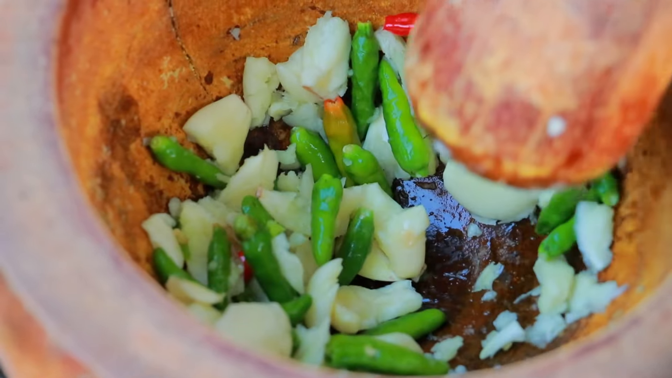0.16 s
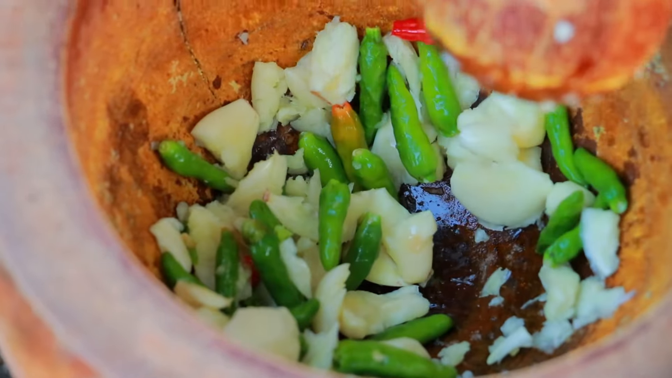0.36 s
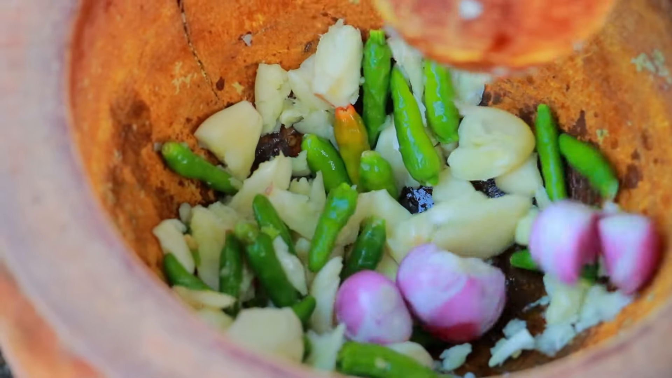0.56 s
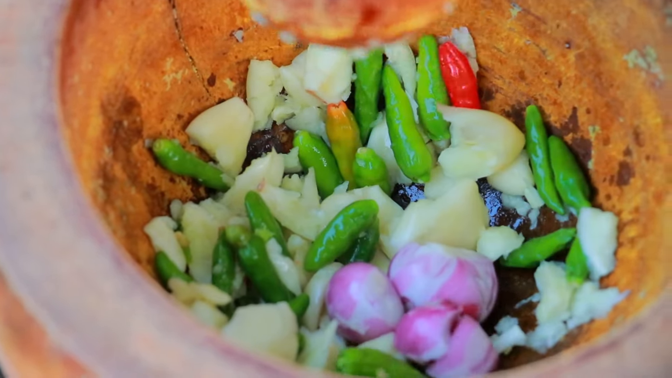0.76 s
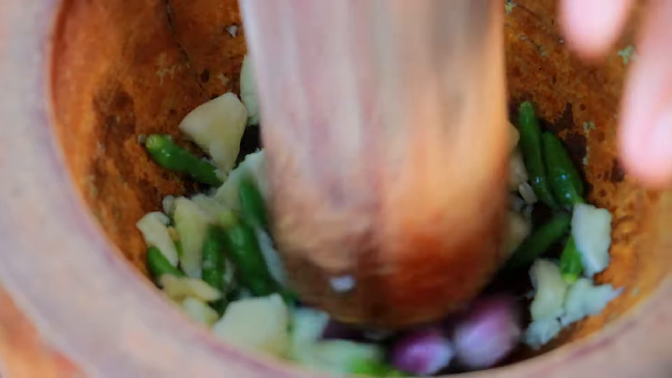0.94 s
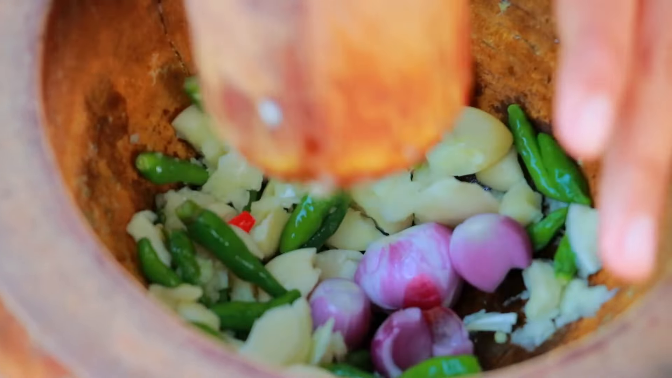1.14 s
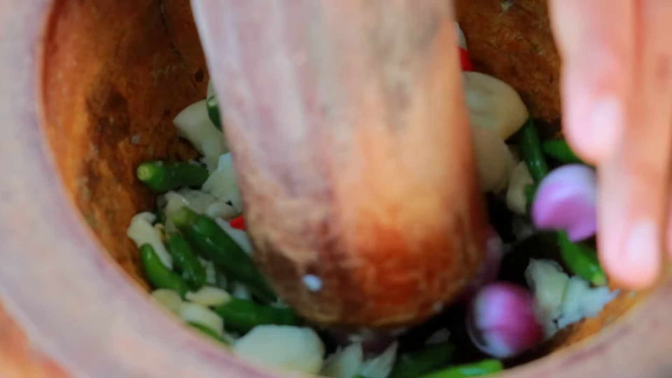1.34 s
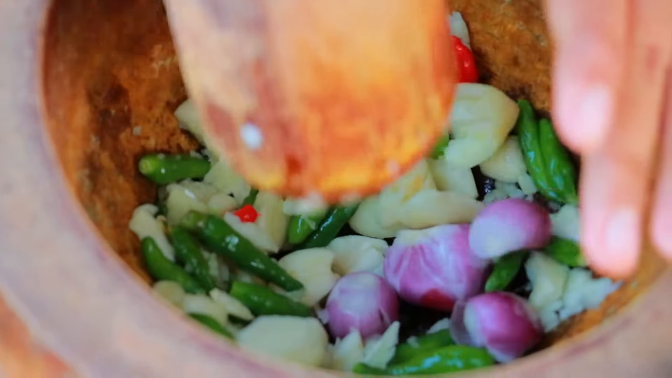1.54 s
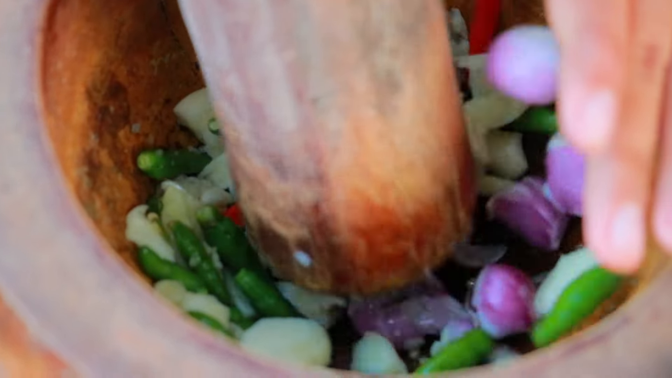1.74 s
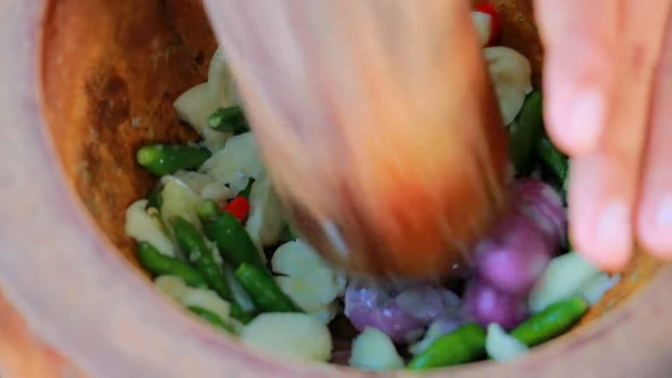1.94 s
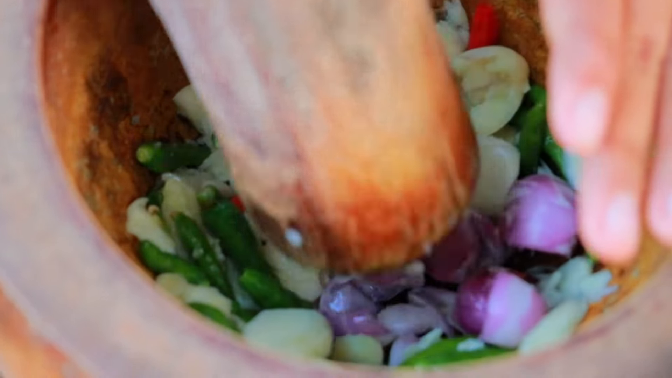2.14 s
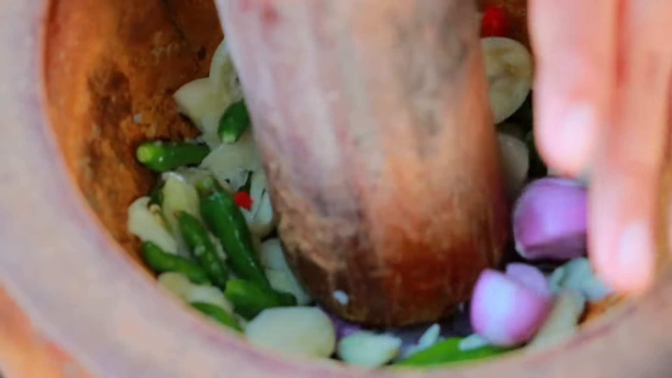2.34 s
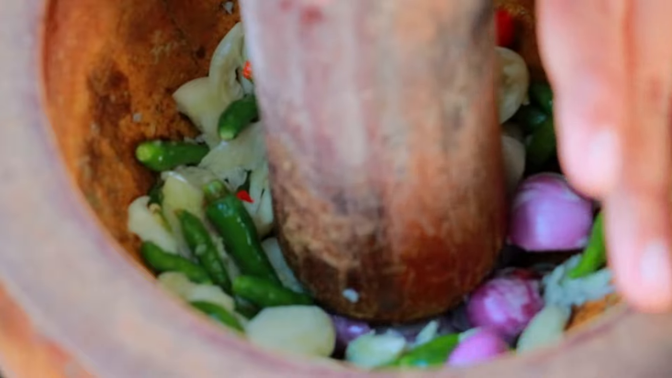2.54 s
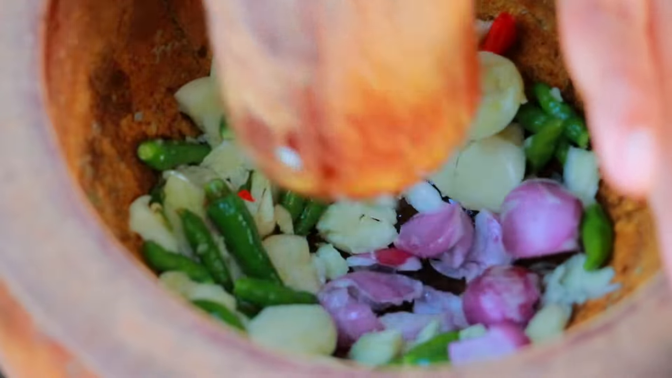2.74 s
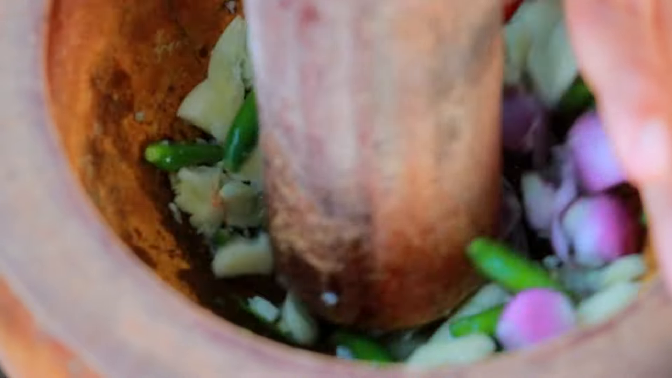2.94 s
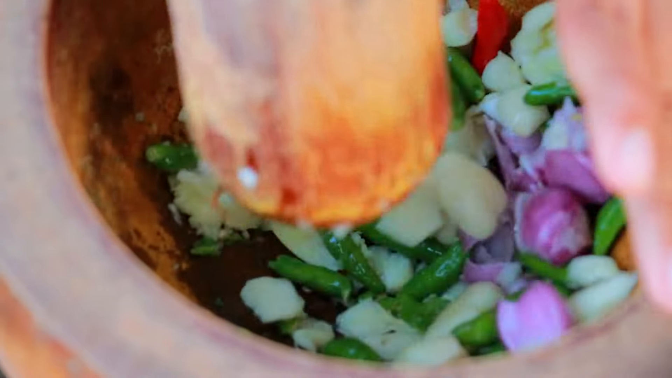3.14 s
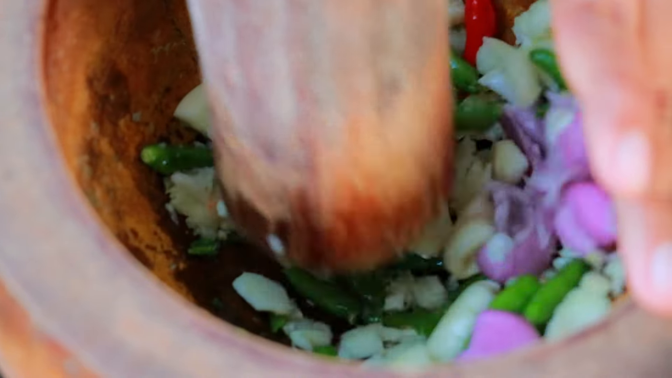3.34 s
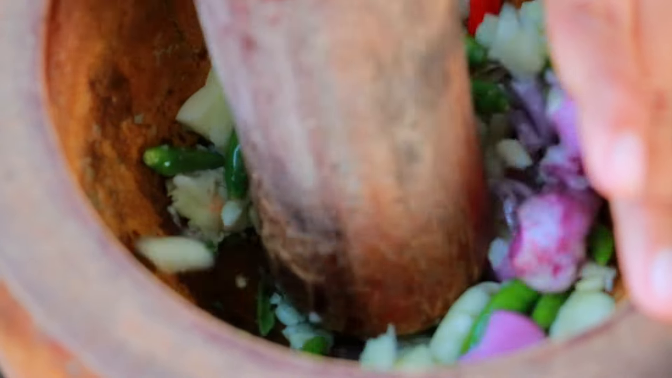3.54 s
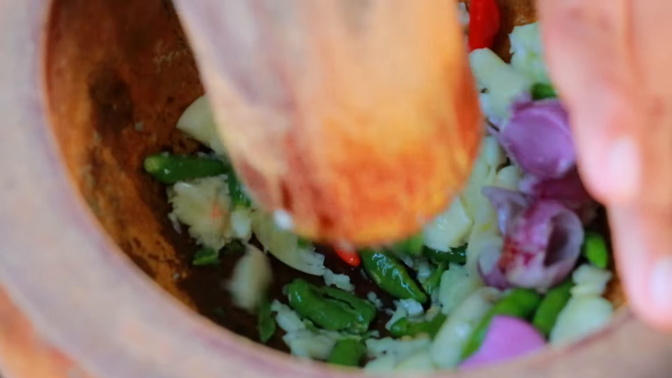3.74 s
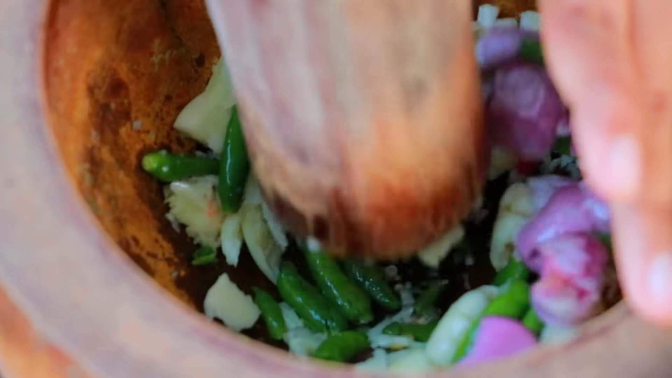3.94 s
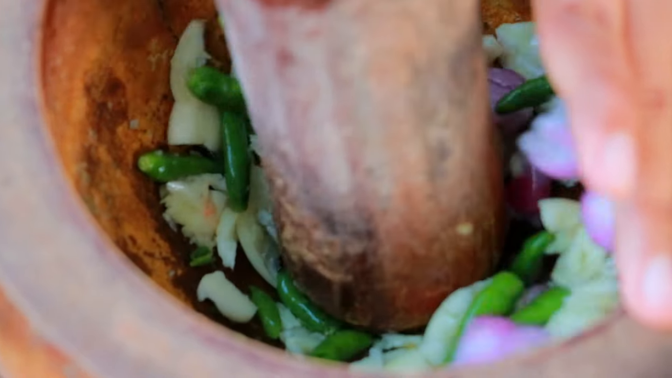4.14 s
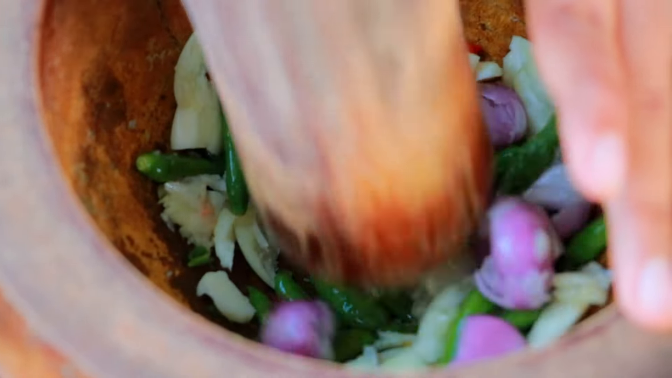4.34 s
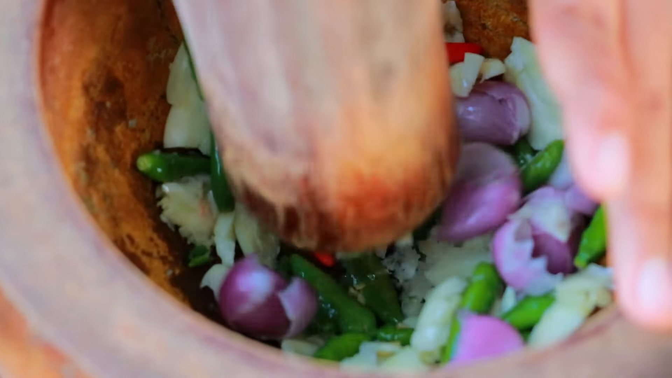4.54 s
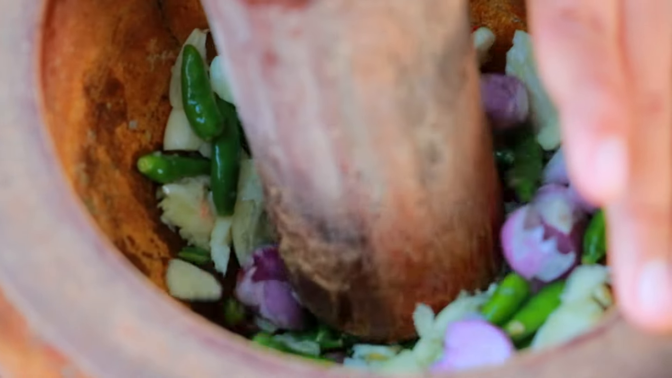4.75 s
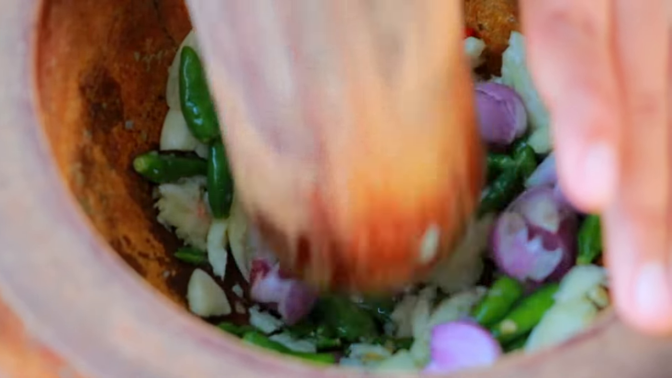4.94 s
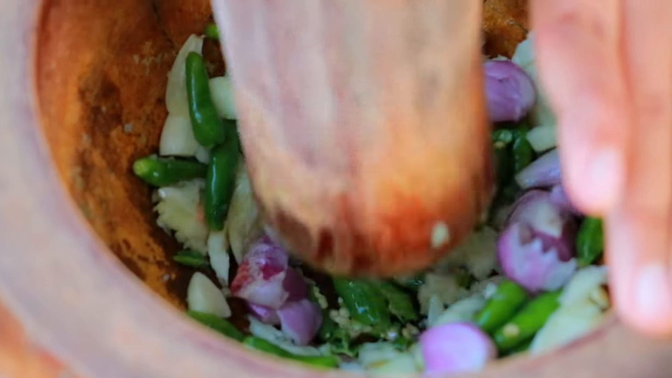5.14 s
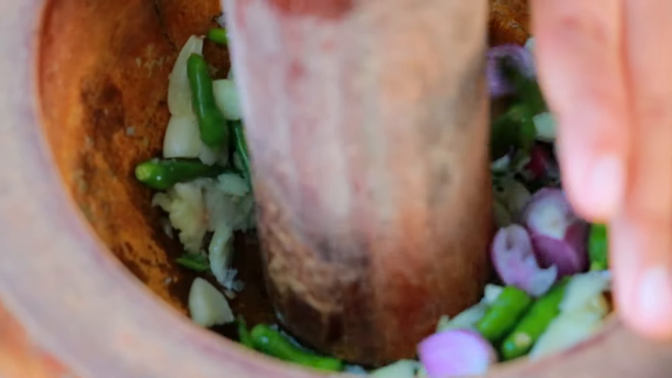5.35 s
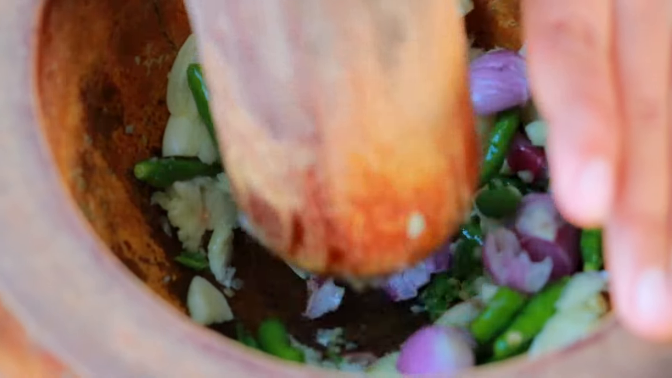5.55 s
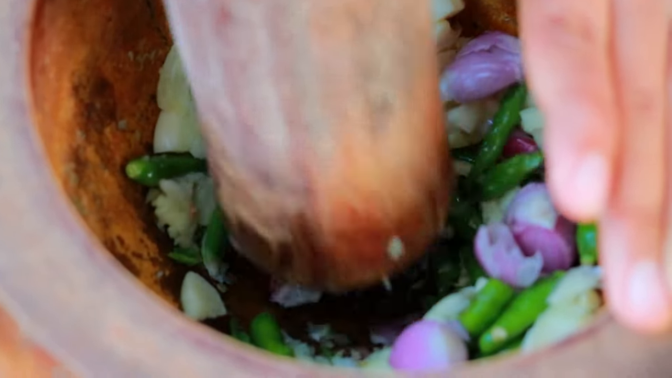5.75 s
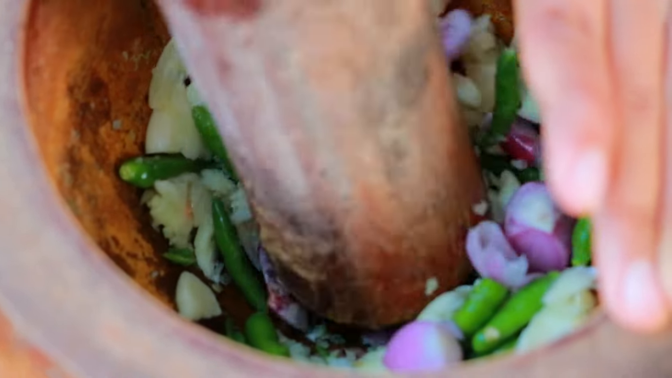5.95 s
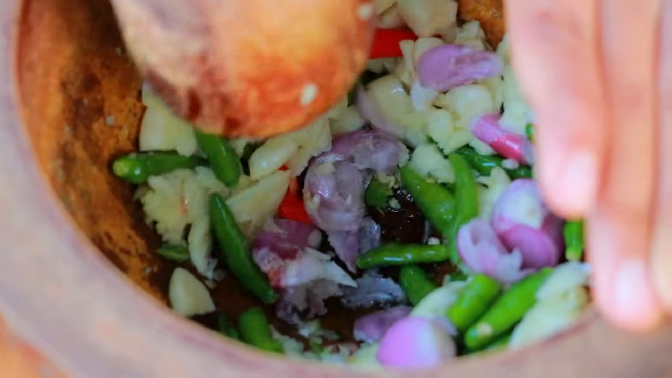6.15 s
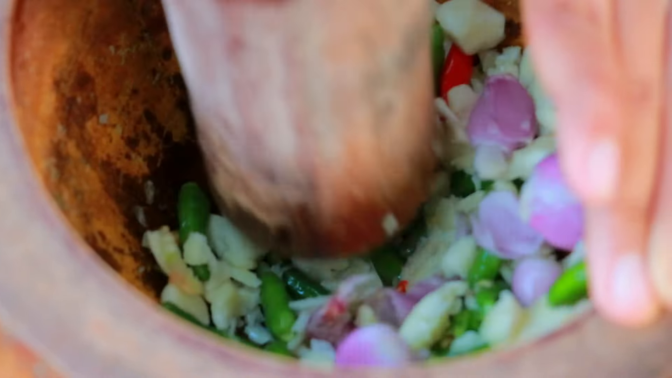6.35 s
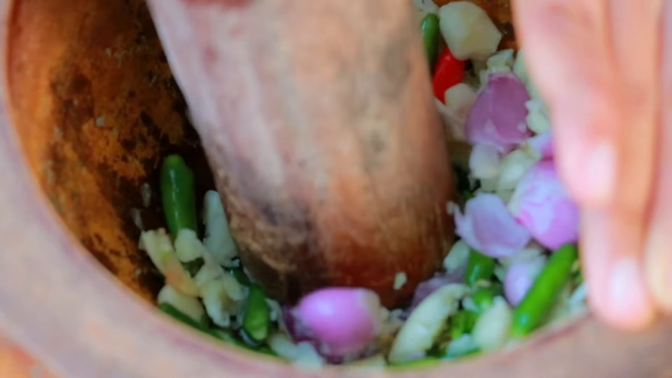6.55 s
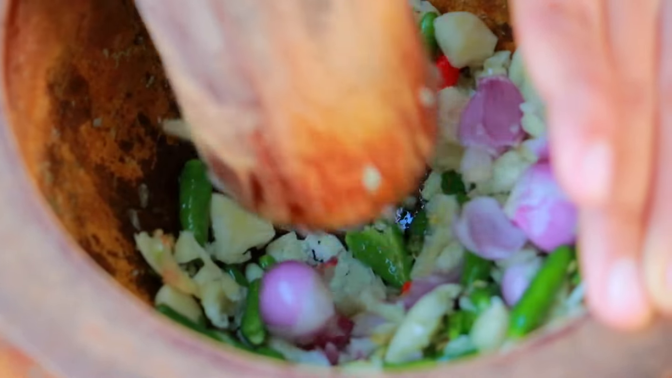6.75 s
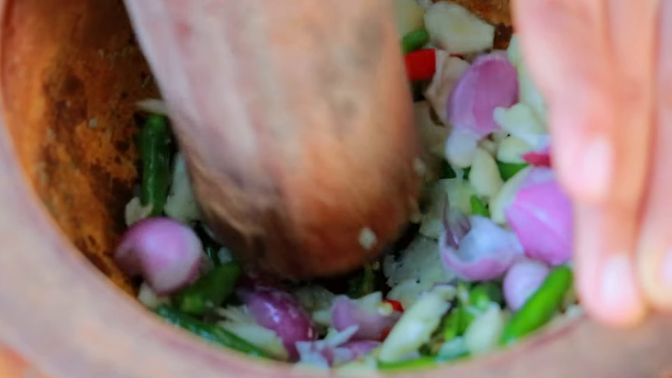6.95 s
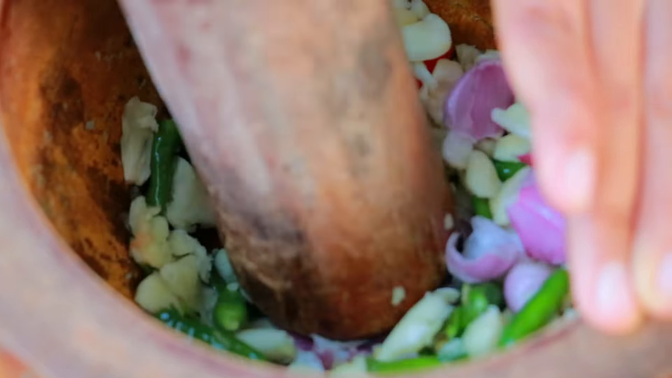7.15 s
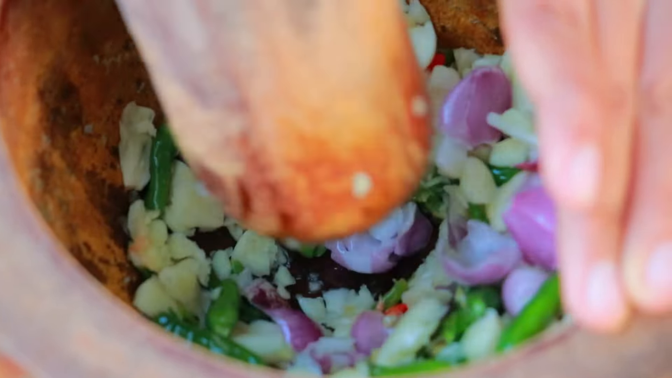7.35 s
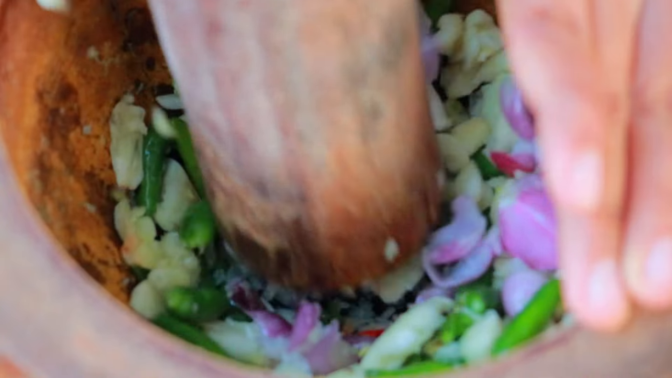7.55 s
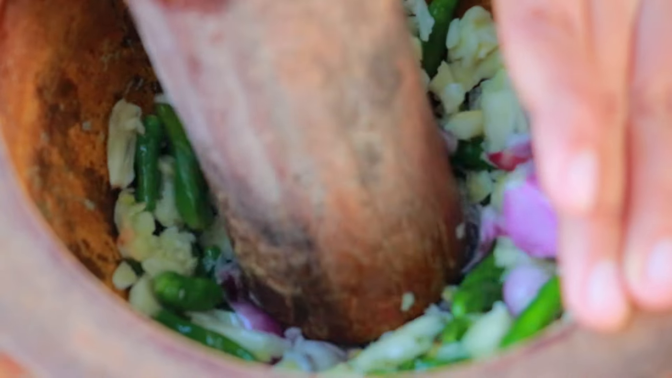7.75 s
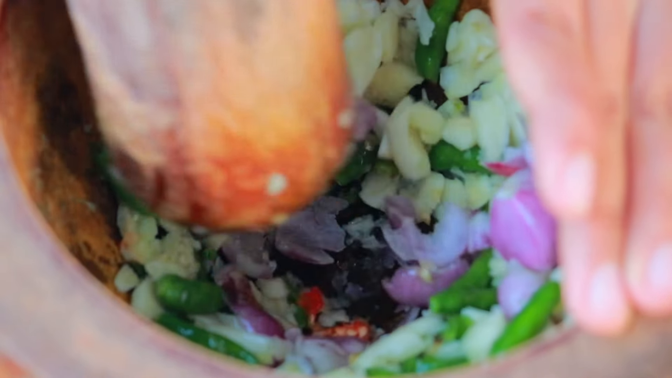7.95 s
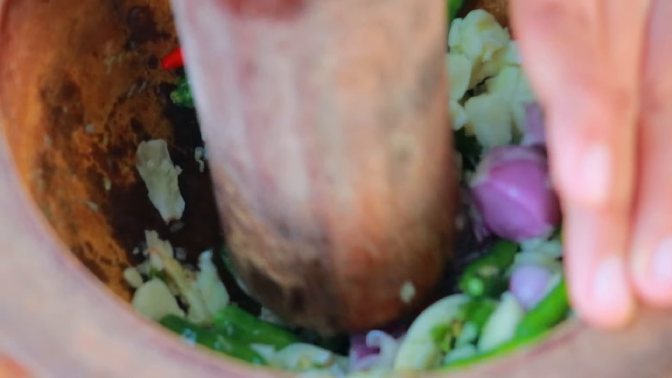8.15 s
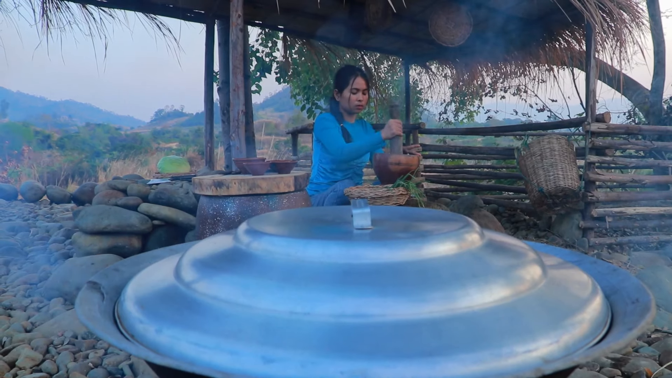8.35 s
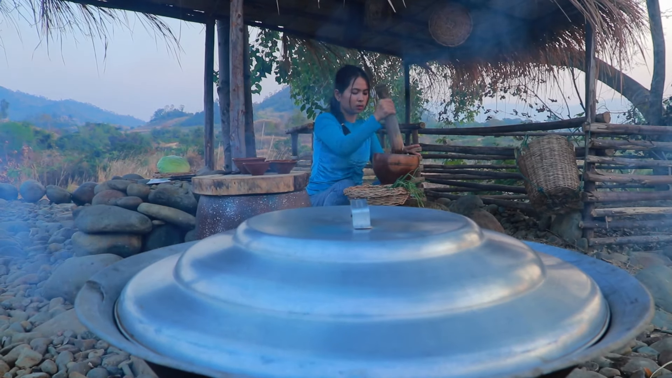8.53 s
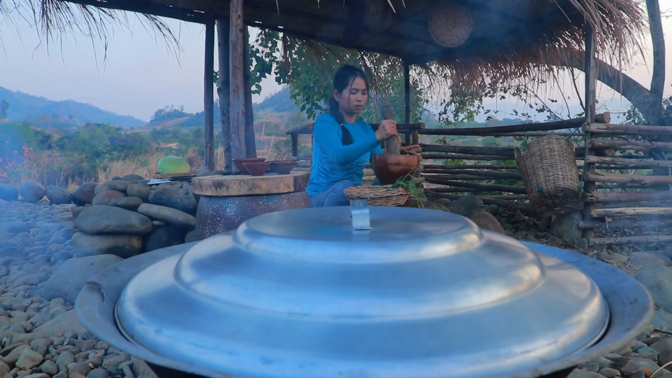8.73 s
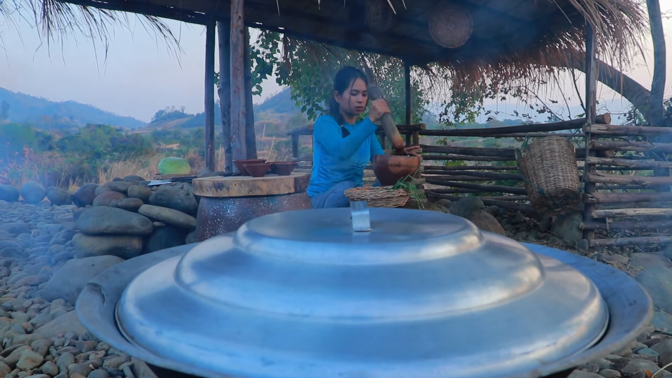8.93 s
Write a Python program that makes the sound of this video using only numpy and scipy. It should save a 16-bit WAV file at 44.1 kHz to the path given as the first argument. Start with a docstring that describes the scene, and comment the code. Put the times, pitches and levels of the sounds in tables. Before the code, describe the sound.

Shallots drop softly into a clay mortar, then steady pestle blows crunch and knock, close and loud, before the last strokes sound from farther off.

```python
"""Wet crunches and hard knocks: a wooden pestle pounds garlic, chilies and shallots in a clay mortar outdoors.
Crunches are bursts of crackling noise; knocks are short fading tones of the bowl, its clay and its foot.
Pestle bounces, falling pieces, squelches and gritty scrapes fill the gaps; the loudest peaks are clipped.
A bird whistles now and then over hiss, breeze and a far drone, made of sliding tones and filtered noise.
After a very brief dip in level, the last two strokes are heard from across the yard."""
import sys
import numpy as np
from scipy import signal
from scipy.fft import rfft, irfft, next_fast_len
from scipy.io import wavfile
from scipy.ndimage import uniform_filter1d

SR = 44100
rng = np.random.default_rng(int(sys.argv[2]) if len(sys.argv) > 2 else 0)


def log_audio(samples):
    """Write samples as a 16-bit WAV file to the path given in sys.argv[1]."""
    # one column per channel
    frames = np.atleast_2d(samples).T
    # limit to full scale, then quantise
    limited = np.clip(frames, -1, 1)
    pcm = np.round(limited * 32767).astype(np.int16)
    wavfile.write(sys.argv[1], SR, pcm)


N = 396459
TIME = np.arange(N) / SR
CUTOFF_HZ = 16000   # top of the sound

# downstrokes of the pestle: (time [s], knock level [dB], hollow pitch of the bowl [Hz], contact time [ms],
# clay ring level [dB], crunch level [dB], crunch fade [ms], crunch treble [dB], bench boom level [dB])
STROKES = [ (1.023, -10.5, 525, 0.92, -6, -20.5, 6.5, 7.5, -55),
           (1.369, -4.5, 638, 0.14, -19.5, -4.5, 2.2, 0, -30),
           (1.693, -3, 520, 0.74, -17.5, 0.5, 4.2, -9.5, -34),
           (2.050, -1.5, 546, 0.96, -8, -7, 4.4, 0.5, -34),
           (2.402, -9.5, 724, 0.73, -0.5, -1.5, 1.93, -5.5, -30),
           (2.952, 18, 760, 0.83, -13.5, -21.5, 17, -2.5, -48),
           (3.297, -13, 663, 0.48, -7.5, 0, 2.13, 1, -26), (3.591, 6.5, 596, .46, -11.5, 4.5, 2.2, -6, -25),
           (3.884, 10, 476, 0.68, -25, 7, 2.3, -11.5, -28),
           (4.1667, 9.5, 591, 1.06, -6.5, 5.5, 3.4, -11.5, -28.5),
           (4.459, 14.5, 629, 0.64, -15, 4.5, 2.45, -7.5, -25),
           (4.752, 8, 490, 0.34, -16.5, 1, 4.2, -8, -27.5),
           (5.062, 12, 574, 2.08, -20, -1, 4.7, -2.5, -35.5),
           (5.377, 13.5, 515, 1.07, -10, -9, 7.2, 5, -27.5),
           (5.687, 17.5, 611, 0.5, -3.5, 3, 3.1, -3.5, -26),
           (5.982, -7, 530, .6, -8.5, -3.5, 3.2, -1.5, -27.5),
           (6.261, 14, 863, 0.97, -10.5, -21.5, 13, -11, -41),
           (6.6033, 5.5, 592, 1.37, -14, 2, 2.8, -2.5, -26), (6.897, -8, 636, 0.4, -12, 2, 2.47, 0.5, -27),
           (7.201, -26, 670, 0.22, 0, -1.5, 6.8, 0, -50), (7.501, 2.5, 634, 0.19, -26, 3, 4.5, -20.5, -25),
           (7.806, 15.5, 654, 0.37, -8, 2, 4, -0.5, -31.5),
           (8.08, -6.5, 480, 1.77, 1.5, -22.5, 2.9, 12.5, -53),
           (8.3533, 7, 730, 0.067, -14, -9, 2.8, -30, -31),
           (8.764, 10.5, 724, 0.33, -16.5, -20, 10.5, -37, -46)]
# shallots drop in, and pieces tumble back as the pestle lifts: (time [s], level [dB])
TUMBLES = [(.551, -21), (.572, -18), (.635, -32), (.658, -30), (.763, -31), (1.166, -26), (1.492, -22.5),
           (2.520, -26), (3.997, -27.5), (4.333, -26), (5.563, -35), (6.857, -23), (6.983, -25)]
# colour of the crunch: (frequency [Hz], relative level [dB])
CRUNCH_COLOUR = [(100, -51.5), (400, 5.5), (750, 6), (1100, -4.5), (1500, 2), (2100, 0), (3000, 2),
                 (4500, 1.5), (6500, -3.5), (8600, 0.5), (10500, -7), (15500, -9)]
# brief dip in level before the strokes heard from afar: (start [s], end [s])
LULL = (8.207, 8.262)


def from_db(db):
    """Turn decibels into a gain."""
    return 10 ** (np.asarray(db) / 20)


def rms_one(x):
    """Scale a signal to an average power of one."""
    return x / np.sqrt(np.mean(x ** 2) + 1e-20)


def add(out, s, sound):
    """Mix a sound in at time s, in seconds."""
    i = max(round(s * SR), 0)
    out[i:i + len(sound)] += sound[:max(N - i, 0)]


def level_curve(rows):
    """Draw a gain over time through rows of time [s] and level [dB]."""
    return from_db(np.interp(TIME, *np.transpose(rows)))


def coloured(x, spectrum):
    """Shape a signal by a smooth spectrum; white noise keeps its power."""
    hz, db = np.transpose(spectrum)
    size = next_fast_len(len(x))
    bins = np.maximum(np.fft.rfftfreq(size, 1 / SR), 1)
    gain = from_db(np.interp(np.log(bins), np.log(hz), db))
    gain = gain * (bins < CUTOFF_HZ + 500)
    return irfft(rfft(x, size) * rms_one(gain), size)[:len(x)]


def resonate(x, hz, width_hz):
    """Pass a signal through one resonance, with a gain of about one at its top."""
    r = np.exp(-np.pi * width_hz / SR)
    forward = np.array([1, 0, -1]) * (1 - r * r) / 2
    feedback = [1, -2 * r * np.cos(2 * np.pi * hz / SR), r * r]
    return signal.lfilter(forward, feedback, x)


def crackle(t, grain_db, clump_db):
    """Tiny snaps of very uneven size, bunched in clumps, with an average power of one."""
    knots = t[::SR // 1200]   # clump strength changes about 1200 times a second
    clumps = from_db(clump_db * np.interp(t, knots, rng.standard_normal(len(knots))))
    sizes = from_db(grain_db * np.minimum(rng.exponential(1, len(t)), 4))
    return rms_one(rng.standard_normal(len(t)) * sizes * clumps)


def ring(modes, t):
    """Fading tones; each blow lands elsewhere and so changes their levels and pitches a little."""
    hz, db, t60 = np.transpose(modes)[:, :, None]
    weight, shift = rng.standard_normal((2, len(modes), 1))
    level = from_db(db + 2 * weight - 60 * t / t60)
    pitch = hz * (1 + .012 * shift)
    return np.sum(level * np.cos(2 * np.pi * pitch * t), axis=0)


def shelter(x, t60, dull_hz):
    """Scattered echoes from posts, roof and ground, made of fading noise with its treble softened."""
    t = TIME[:SR // 2]
    fade = from_db(-60 * t / t60) * (t > .004)   # the first echo comes after 4 ms
    echoes = rng.standard_normal(len(t)) * fade
    echoes = signal.lfilter(*signal.butter(1, dull_hz, fs=SR), echoes / np.linalg.norm(echoes))
    return signal.fftconvolve(x, echoes)[:N]


def outdoors(air_db=-48, drone_hz=145, drone_width_hz=70):
    """Steady hiss of the open air over a low, changing breeze and a far-off drone, all filtered noise."""
    # colour of the outdoor air: (frequency [Hz], relative level [dB])
    air_colour = [(25, -1), (70, -8.5), (150, -2), (240, -6.5), (450, -10), (750, -6), (1200, -9),
                  (2500, -13.5), (5400, -19), (6500, -15), (7800, -20), (10000, -22.5), (11000, -26),
                  (16000, -26)]
    # low rumble of the breeze: (time [s], level [dB])
    breeze_level = [(0, -72), (.7, -61), (1.0, -46.5), (1.6, -51.5), (2.2, -51), (2.7, -72), (5, -67.5),
                    (8.1, -59.5), (8.4, -56.5), (8.99, -51)]
    # colour of the breeze: (frequency [Hz], relative level [dB])
    breeze_colour = [(20, 5.5), (65, 3.5), (100, -3.5), (170, -9.5), (300, -11.5), (1000, -35), (5000, -52)]
    # far-off low drone: (time [s], level [dB])
    drone_level = [(0, -58), (3.5, -87), (4.5, -95), (5.8, -53), (7, -66), (8.2, -58), (8.3, -51.5),
                   (8.99, -46.5)]
    air = from_db(air_db) * coloured(rng.standard_normal(N), air_colour)
    breeze = level_curve(breeze_level) * coloured(rng.standard_normal(N), breeze_colour)
    hum = rms_one(resonate(rng.standard_normal(N), drone_hz, drone_width_hz))
    return air + breeze + level_curve(drone_level) * hum


def bird():
    """Thin distant whistles, level or sliding; a randomly wavering pitch makes some of them hoarse."""
    # notes: (time [s], length [s], start pitch [Hz], end pitch [Hz], level [dB], pitch spread [Hz])
    notes = [(2.21, .07, 2440, 2630, -52, 60), (5.101, 0.15, 3880, 3880, -46, 220),
             (8.438, 0.08, 4560, 2510, -47, 40), (8.698, 0.023, 4050, 3950, -51, 40),
             (8.8, 0.076, 4660, 2440, -44.5, 39.6), (8.892, 0.046, 2290, 2310, -45, 70)]
    out = np.zeros(N)
    for s, length, start_hz, end_hz, db, spread_hz in notes:
        u = np.linspace(0, 1, int(length * SR))   # progress through the note
        waver = rms_one(uniform_filter1d(rng.standard_normal(SR // 2), size=80))[:len(u)]
        pitch = start_hz * (end_hz / start_hz) ** u + spread_hz * waver
        whistle = np.sin(2 * np.pi * np.cumsum(pitch) / SR)
        add(out, s, from_db(db) * np.sin(np.pi * u) * whistle)
    return out


def crumbs(db=-60.5, per_s=26, fade_s=0.0014):
    """Wet scraps shift and drop, each a faint, quickly fading tick of noise at a random moment."""
    born = (rng.random(N) < per_s / SR) * (TIME > TUMBLES[0][0]) * (TIME < LULL[0])
    sizes = born * rng.random(N) ** 2
    ticks = signal.lfilter([1], [1, -np.exp(-1 / (fade_s * SR))], sizes + 1e-18)
    return from_db(db) * rms_one(coloured(ticks * rng.standard_normal(N), CRUNCH_COLOUR))


def scrapes():
    """Something hard catches and slips on the rim: a few jerks of crackle make resonances sound."""
    # jerks: (time [s], relative level [dB], fade [ms])
    jerks = [(2.783, -37, 18), (2.826, -39.5, 34), (2.8396, -19, 2), (2.856, -31.5, 12), (2.868, -55, 16)]
    # resonances: (frequency [Hz], width [Hz], level [dB])
    peaks = [(1480, 63, 1), (3510, 260, -5.5), (3600, 290, 3.5), (4770, 210, 4), (6030, 1550, -15),
             (8450, 1100, -23)]
    grit, t = np.zeros(N), TIME[:SR // 8]
    for s, db, fade_ms in jerks:
        fade = np.exp(-1000 * t / fade_ms)
        add(grit, s, from_db(db + 8.5) * fade * crackle(t, grain_db=5.5, clump_db=5.0))
    return sum(from_db(db) * resonate(grit, hz, width_hz) for hz, width_hz, db in peaks)


def bench(hz=69, t60=0.19, swell_s=0.014):
    """The bench under the mortar gives a low boom that swells and dies away."""
    out, t = np.zeros(N), TIME[:SR // 3]
    fade = np.exp(-np.log(1000) * t / t60)
    boom = np.sin(2 * np.pi * hz * t) * fade * (1 - np.exp(-t / swell_s))
    for s, *_, db in STROKES:
        add(out, s, from_db(db) * boom)
    return out


def crushings(splinter_count=3):
    """List all crushing: strokes squeeze, burst and splinter the flesh; squelches and cracks come between."""
    # flesh squelches and skins rustle: (time [s], length [ms], level [dB], treble [dB])
    squelches = [ (0.55, 6.8, -36, 0.5), (.570, 75, -50.5, 6.5), (0.724, 27, -51.5, 8.5),
                 (0.784, 35, -54.5, 13.5), (2.038, 7.9, -21, 3.5), (2.548, 5.7, -38.5, -21),
                 (2.965, 28, -26, -8), (3.245, 62, -45, -.5), (3.541, 8, -34, -30), (3.69, 7, -38, -29),
                 (3.995, 14, -37.5, -33), (4.061, 3.5, -40.5, -28), (6.077, 31, -47.5, -5.5),
                 (6.263, 43, -24.5, -12), (6.349, 28, -40.5, -2), (6.428, 24, -49, -.5),
                 (7.407, 18.4, -50.5, 16.5), (7.605, 24, -57, 13.5), (7.694, 8, -55, 13.5),
                 (7.871, 17.4, -32.5, 2.5), (8.089, 17.5, -25, -8), (8.113, 12.4, -19.5, -6)]
    # single crisp skins crack: (time [s], level [dB])
    skin_cracks = [(.861, -37), (.934, -37.5), (1.181, -31), (1.713, -20), (3.286, -19), (3.903, -16.5),
                   (4.101, -37), (4.740, -21), (6.311, -16.5), (7.536, -22.5)]
    # splinters follow a burst after a random delay: (shortest [s], longest [s])
    splinter_delay = (0.011, .045)
    squeeze_db, squeeze_rise_ms, burst_rise_ms = -27, 6.44, 1.67   # flesh creaks just before it bursts
    splinter_db, splinter_spread_db, splinter_fade_db_per_s = -27, 2, 307.5   # level against the burst
    crack_ms, crack_treble_db = 1.28, 2
    # rows: (time [s], level [dB], build-up [ms], hold [ms], fade [ms], treble [dB])
    rows, cracks = [], list(skin_cracks)
    for s, *_, db, fade_ms, treble_db, _ in STROKES:
        rows.append((s, db + squeeze_db, squeeze_rise_ms, 0, fade_ms, treble_db))
        rows.append((s, db, burst_rise_ms, 0, fade_ms, treble_db))
        for delay in rng.uniform(*splinter_delay, splinter_count):
            weaker_db = splinter_db - splinter_fade_db_per_s * delay   # later splinters tend to be weaker
            uneven_db = splinter_spread_db * rng.standard_normal()
            cracks.append((s + delay, db + weaker_db + uneven_db))
    for s, ms, db, treble_db in squelches:
        rows.append((s, db, 0.17 * ms, ms, 0.3 * ms, treble_db))
    for s, db in cracks:
        rows.append((s, db, crack_ms, 0, crack_ms, crack_treble_db))
    return rows


def crunches(seep_db=-40, seep_s=0.051, pocket_db=0, pocket_width_hz=400, treble_hz=4500):
    """Cells snap in clumps, ever louder until the peak of the crush; juice crackles on a little."""
    snaps, bright = np.zeros((2, N))
    t = TIME[:SR // 4] - TIME[SR // 16]   # zero at the moment of the blow
    ms = 1000 * np.abs(t)
    for s, db, rise_ms, hold_ms, fall_ms, treble_db in crushings():
        falling = np.maximum(ms - hold_ms, 0) / fall_ms
        pressure = np.exp(-np.where(t < 0, ms / rise_ms, falling))
        juice = from_db(seep_db) * np.exp(-np.abs(t) / seep_s) * (t > 0)
        burst = pressure * crackle(t, grain_db=4.0, clump_db=4.0)
        burst = burst + juice * crackle(t, grain_db=10.5, clump_db=4.5)
        # air pockets in the wet pulp ring at other pitches each time
        pockets_hz = np.exp(rng.uniform(np.log(1900), np.log(9500), 4))
        pockets = sum(resonate(burst, hz, pocket_width_hz) for hz in pockets_hz)
        burst = from_db(db) * (burst + from_db(pocket_db) * pockets)
        add(snaps, s + t[0], burst)
        add(bright, s + t[0], burst * from_db(treble_db))
    # drier skins snap brighter than soft pulp
    treble = signal.lfilter(*signal.butter(1, treble_hz, "high", fs=SR), bright - snaps)
    return coloured(snaps + treble, CRUNCH_COLOUR)


def contacts(usual_hollow_hz=520, tumble_contact_ms=0.79, tumble_clay_db=-15.5):
    """List all that lands in the bowl: strokes, rebounds (the deeper the note, the softer) and tumbles."""
    # the pestle bounces or slips off the pulp and lands again:
    # (time [s], level [dB], hollow pitch [Hz], clay ring level [dB])
    rebounds = [ (1.736, -10, 756, -4.5), (1.893, -19, 860, -5), (2.433, -11.5, 500, 1),
                (2.9835, 3.5, 556, -0.5), (3.324, -13.5, 403, 1.5), (4.196, -17.5, 427, 8.5),
                (5.080, -21.5, 486, 13), (5.388, 1, 485, 5), (5.424, -12.5, 364, -15),
                (5.698, 14.5, 706, -22), (5.711, -15, 700, -5), (5.724, 0.5, 507, -2.5),
                (5.993, -2, 478, -1.5), (7.537, -6, 480, -14), (7.819, 6.5, 737, -12.5),
                (8.109, -10, 398, -10), (8.142, -9.5, 384, -3)]
    rebound_contact_ms, softening = 1.584, 1.2   # contact at the usual pitch; power by which it grows
    # rows: (time [s], level [dB], hollow pitch [Hz], contact time [ms], clay ring level [dB])
    rows = [stroke[:5] for stroke in STROKES]
    for s, db, hz, clay_db in rebounds:
        contact_ms = rebound_contact_ms * (usual_hollow_hz / hz) ** softening
        rows.append((s, db, hz, contact_ms, clay_db))
    for s, db in TUMBLES:
        rows.append((s, db, usual_hollow_hz, tumble_contact_ms, tumble_clay_db))
    return rows


def knocks(hollow_t60=0.025, swell_s=0.00097, heavy_bass_hz=245, light_bass_hz=420,
           heavy_range_db=3, light_foot_db=-6, foot_growth_db=5):
    """Each landing sounds a short hollow note of the filled bowl, the ring of the clay and a thud in the foot."""
    # the clay mortar: (frequency [Hz], relative level [dB], time to fade by 60 dB [s])
    clay_modes = [(667, 10, 0.023), (658, -27.5, 0.05), (740.4, 2.5, 0.058), (837.5, -3.5, 0.046),
                  (925, -8, 0.07), (1177, -13.5, 0.06), (1336, 10, 0.017), (1546, -14.5, 0.04),
                  (1958, -13.5, 0.044), (2134, -13, 0.075), (2480, -29, 0.028), (3440, -26, 0.03)]
    # the heavy foot of the mortar: (frequency [Hz], relative level [dB], time to fade by 60 dB [s])
    foot_modes = [(151, -17.5, 0.051), (221, -20, 0.034), (272.3, -14, .03), (411.6, -13.5, 0.027)]
    out, t = np.zeros(N), TIME[:SR // 9]
    for s, db, hollow_hz, contact_ms, clay_db in contacts():
        hollow = np.cos(2 * np.pi * hollow_hz * t) * np.exp(-np.log(1000) * t / hollow_t60)
        # only heavy blows (near 1) move the whole mortar, so light taps (near 0) lack bass
        heavy = 1 / (1 + np.exp(-db / heavy_range_db) / 2)
        clay = from_db(clay_db) * ring(clay_modes, t)
        foot = from_db(light_foot_db + heavy * foot_growth_db) * ring(foot_modes, t)
        body = (hollow + clay + foot) * (1 - np.exp(-t / swell_s))   # the bowl needs a moment to start sounding
        lowest_hz = light_bass_hz + heavy * (heavy_bass_hz - light_bass_hz)
        lowest_hz = min(lowest_hz, 0.37 * hollow_hz)   # spare the hollow note
        body = signal.lfilter(*signal.butter(2, lowest_hz, "high", fs=SR), body)
        # pulp under the pestle stretches the contact and dulls the blow
        contact_s = contact_ms / 1000
        force = np.sin(np.pi * np.minimum(t[:SR // 300] / contact_s, 1))
        add(out, s, from_db(db) * np.convolve(body, force / force.sum()))
    return out


def scene(near_echo_db=-31, far_echo_db=-17, bird_echo_db=-8, wall_hz=1500, wall_db=-3, dip_db=-26):
    """The mortar, first close with little echo, then farther off with more, amid bird and open air."""
    mortar = knocks() + bench() + crunches() + crumbs() + scrapes()
    near = mortar * (TIME < LULL[1])
    far = mortar - near
    # from the side the clay wall speaks more
    far = far + from_db(wall_db) * resonate(far, wall_hz, width_hz=330)
    near = near + from_db(near_echo_db) * shelter(near, t60=0.13, dull_hz=4000)
    far = far + from_db(far_echo_db) * shelter(far, t60=0.13, dull_hz=5150)
    calls = bird()
    calls = calls + from_db(bird_echo_db) * shelter(calls, t60=0.11, dull_hz=6000)
    in_lull = (TIME > LULL[0]) & (TIME < LULL[1])
    dip = uniform_filter1d(1.0 * in_lull, size=200)   # soft edges
    return ((near + far + calls + outdoors()) * from_db(dip_db * dip))[None]


def record(dry):
    """Loud blows overload the recorder and are clipped flat; then the top treble is cut."""
    lowpass = signal.ellip(10, .1, 70, CUTOFF_HZ, fs=SR, output="sos")
    return signal.sosfilt(lowpass, np.clip(dry, -.97, .97))


dry = scene()
out = record(dry)
log_audio(out)
```